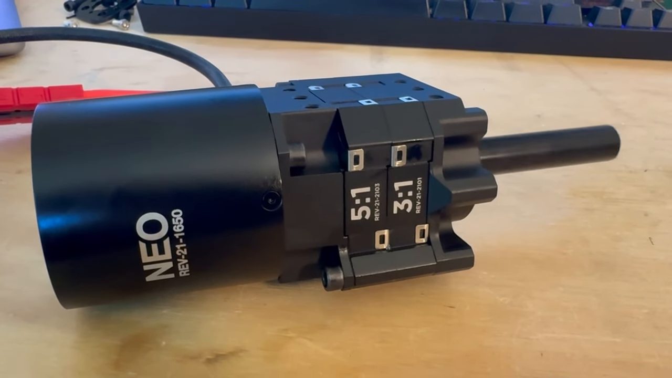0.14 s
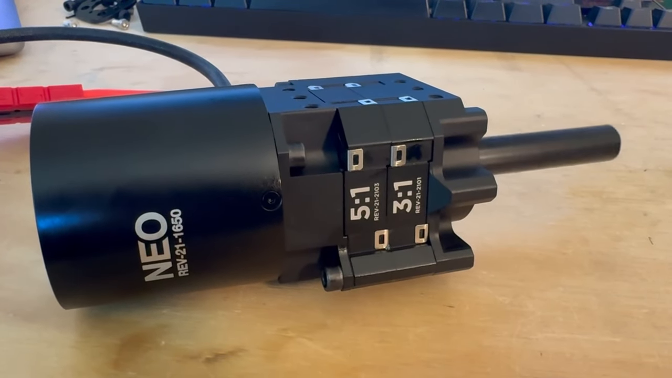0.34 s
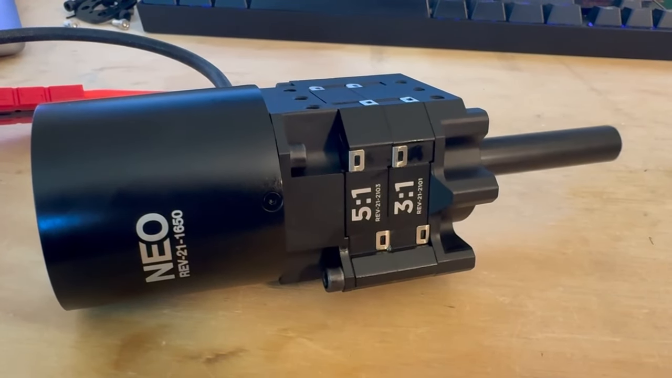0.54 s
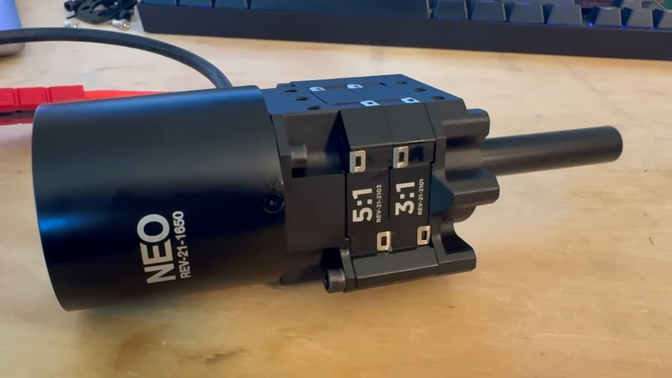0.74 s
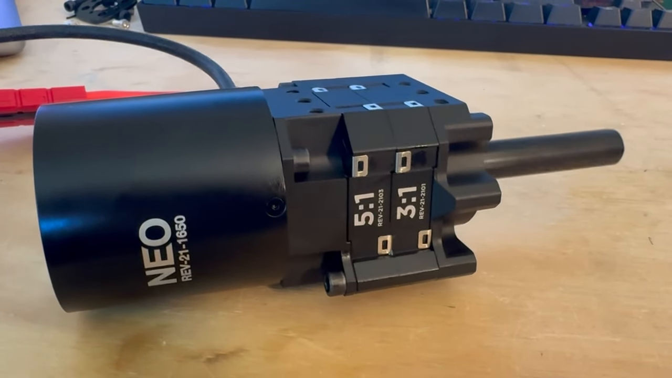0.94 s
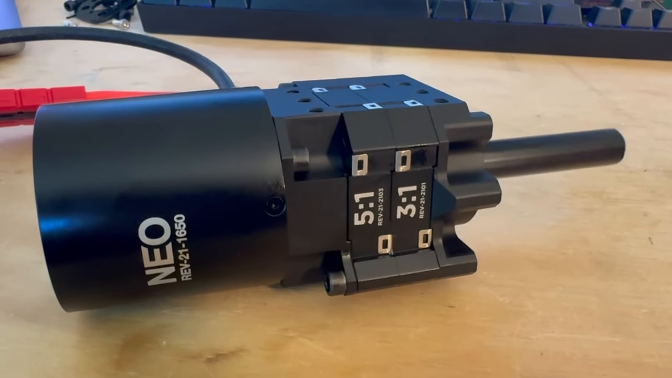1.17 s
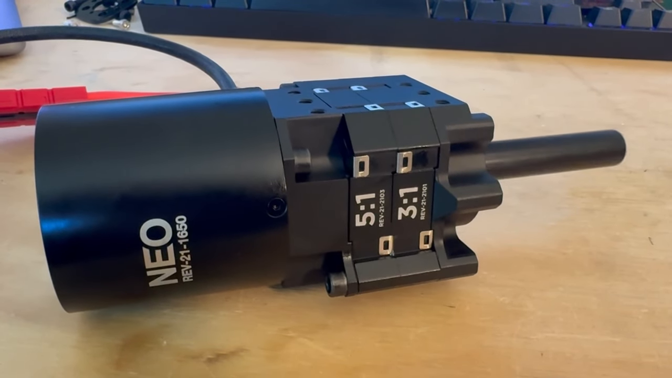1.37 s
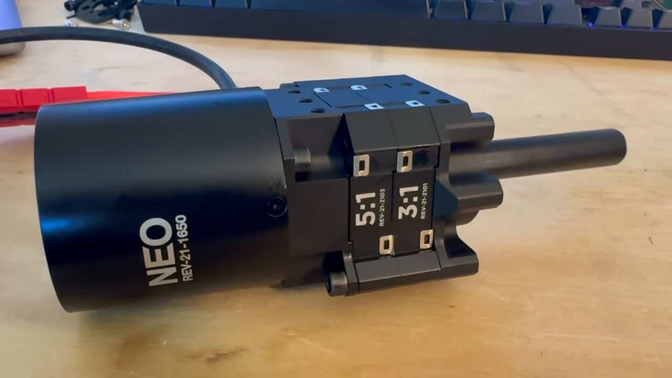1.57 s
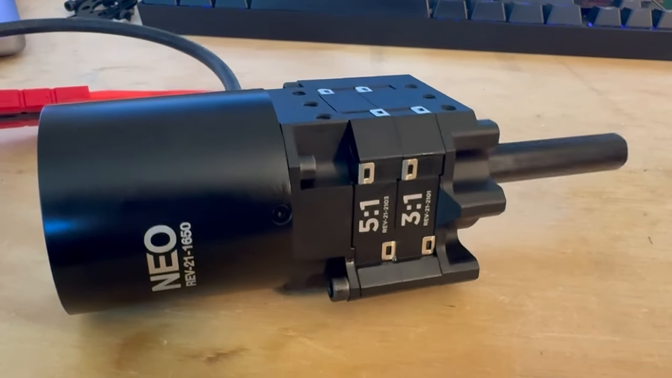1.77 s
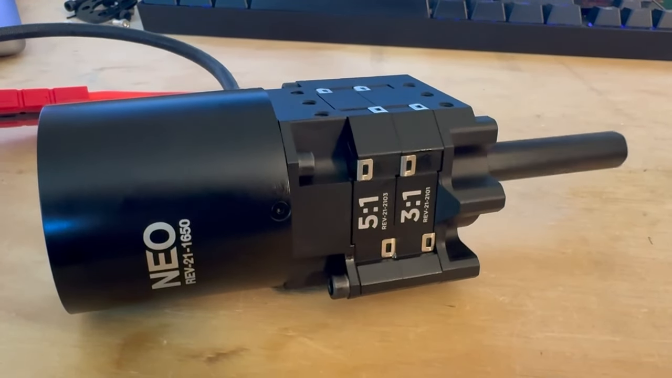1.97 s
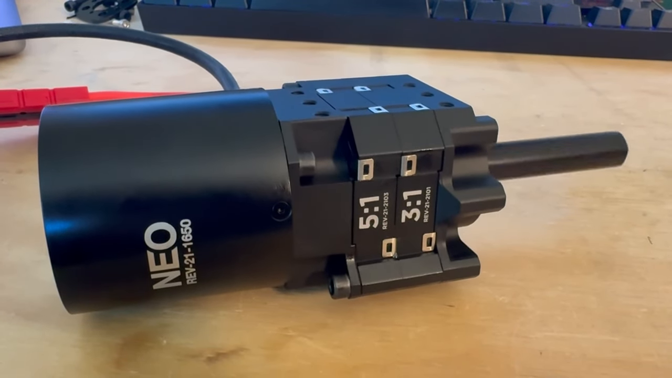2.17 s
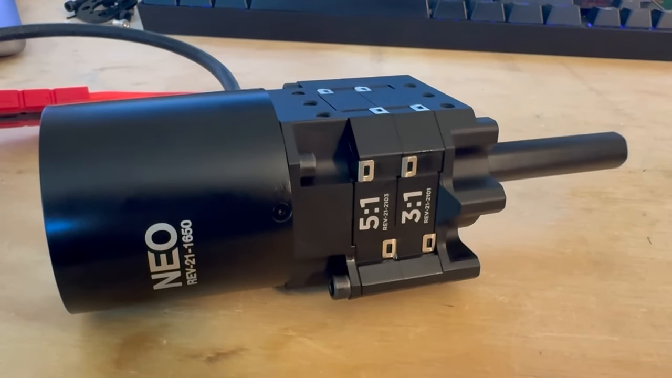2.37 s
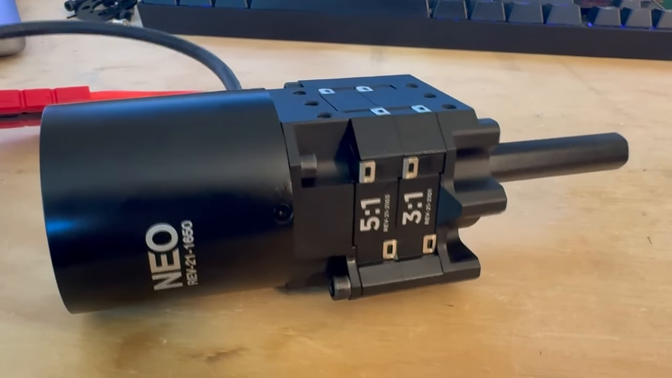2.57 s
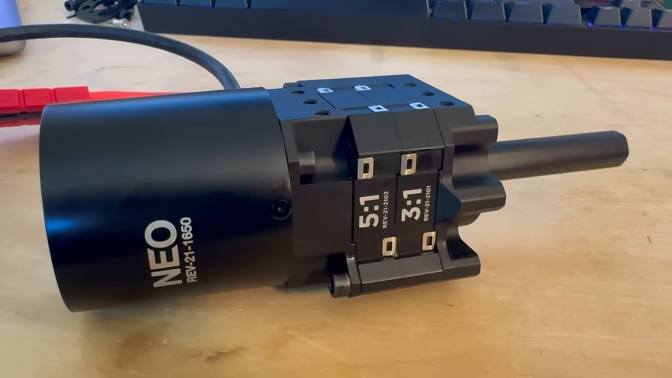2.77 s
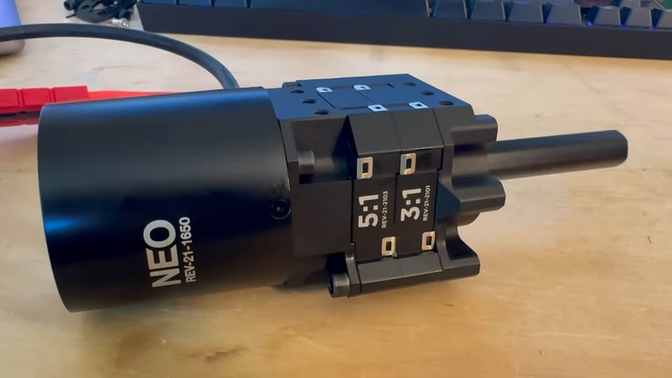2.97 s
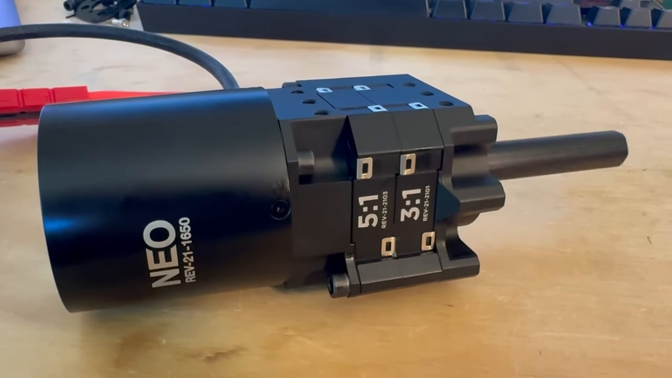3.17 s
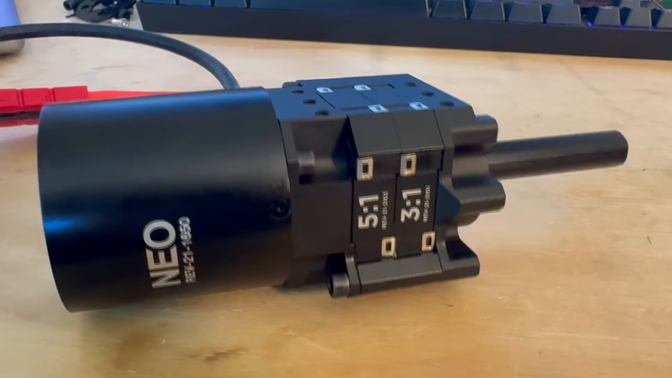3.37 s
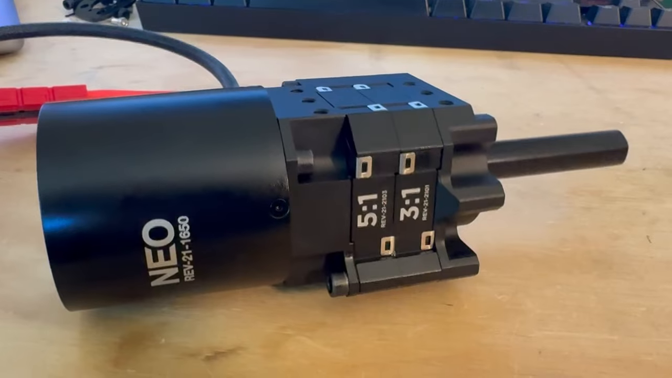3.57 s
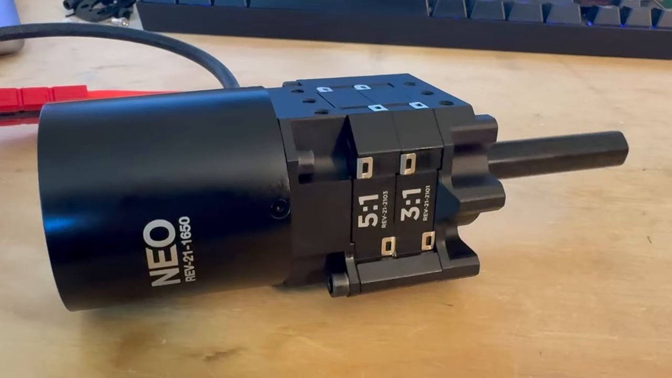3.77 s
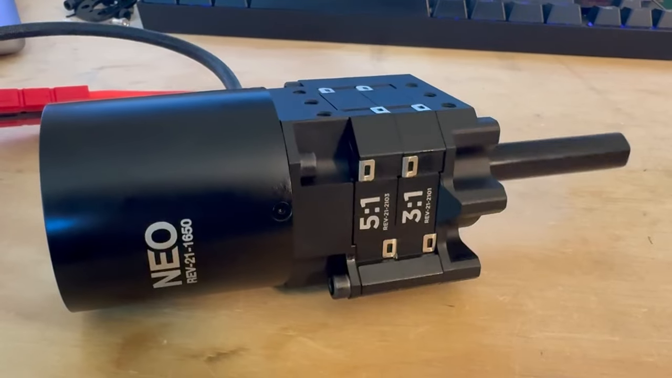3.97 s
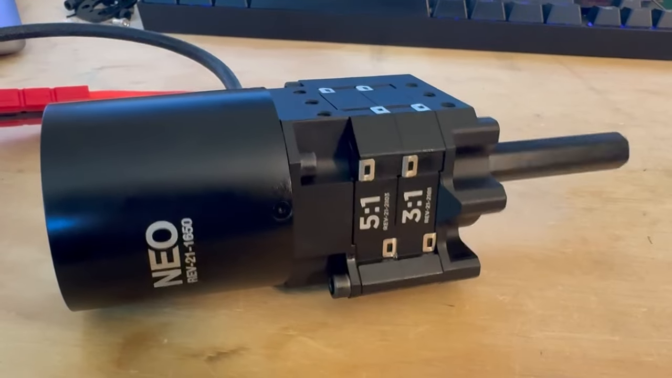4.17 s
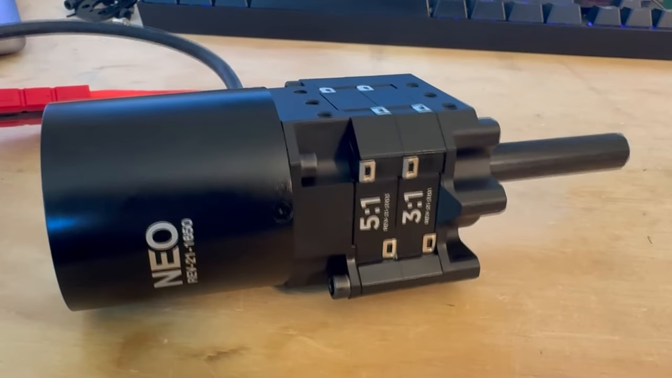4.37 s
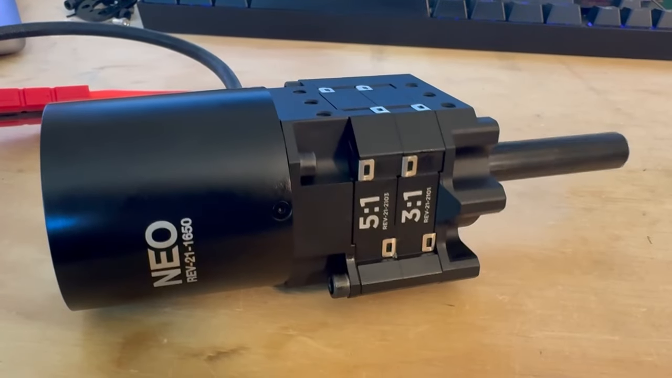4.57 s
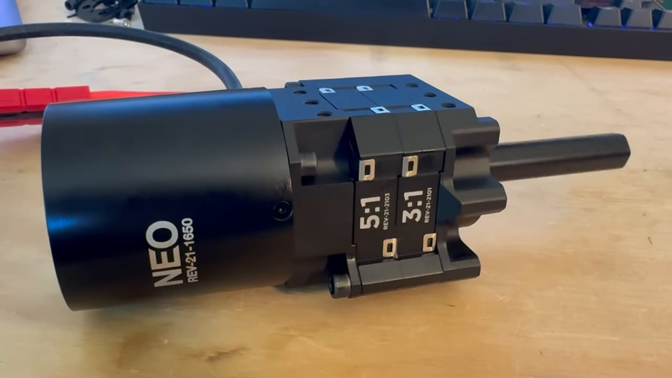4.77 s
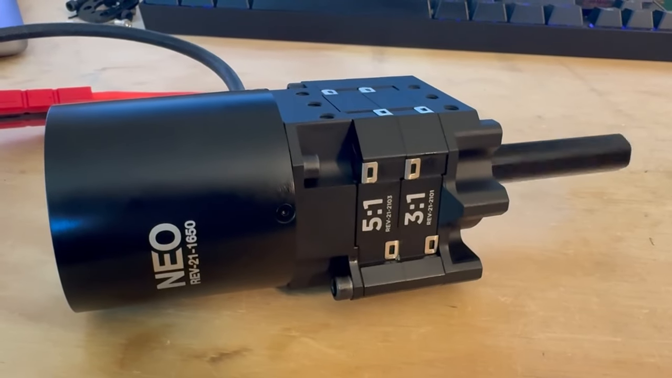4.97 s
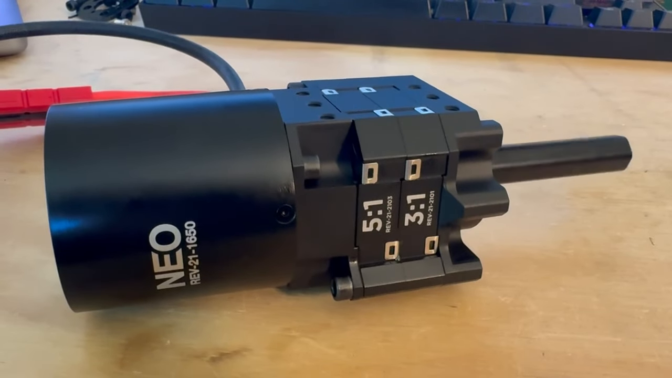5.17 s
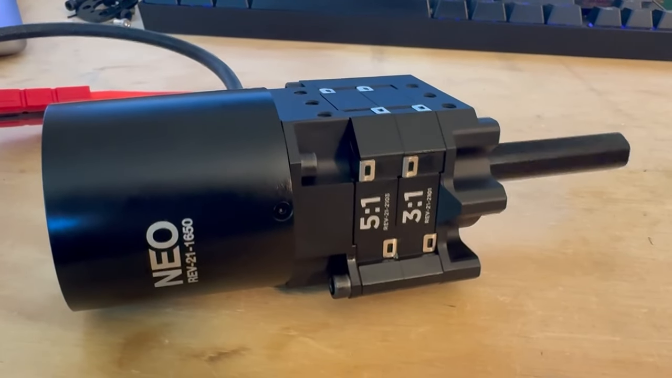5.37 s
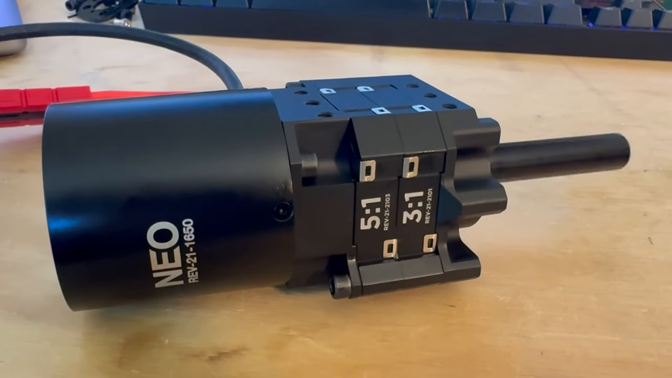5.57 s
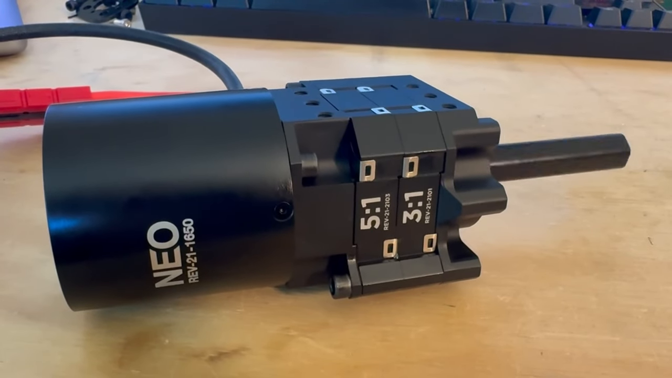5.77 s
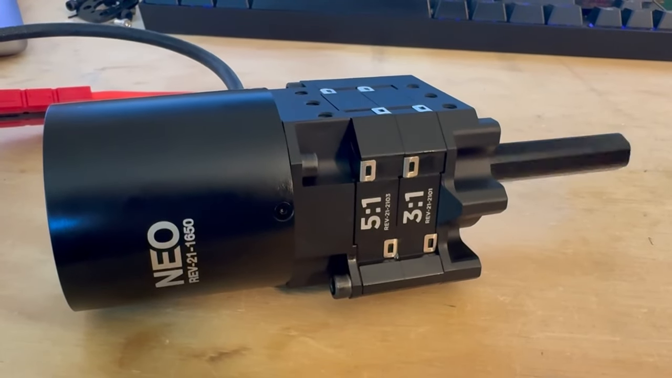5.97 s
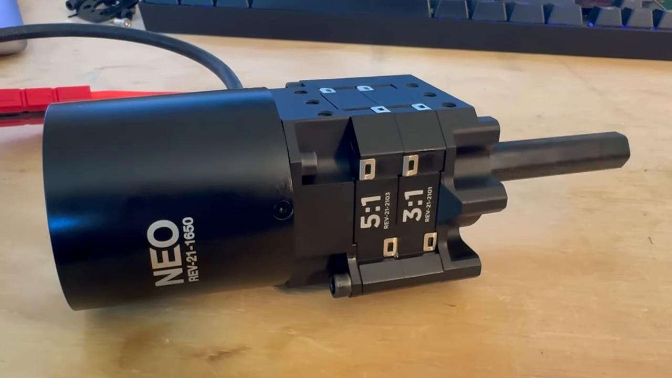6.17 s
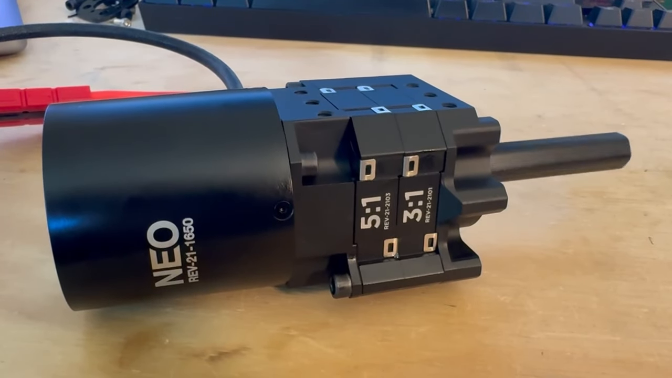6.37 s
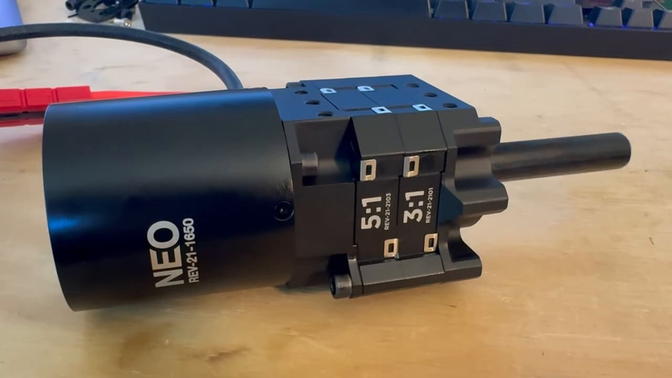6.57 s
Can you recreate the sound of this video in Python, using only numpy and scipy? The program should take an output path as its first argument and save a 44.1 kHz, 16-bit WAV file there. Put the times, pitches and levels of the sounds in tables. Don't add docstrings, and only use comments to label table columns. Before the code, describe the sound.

A small electric motor and gearbox lie on a wooden desk, recorded very close in stereo, dry, with no other activity. From 0 to 0.8 seconds it runs steadily at top speed: a hard layered whine, low desk hum and a bright, sizzling gear hiss strongest around 7 to 9 kilohertz. From about 0.8 seconds pitch and level step downward, quickly until 2.6, with sharper tooth clicks near 1.1, 2.1 and 2.7. It nearly holds around 2.7 to 2.9, then sinks again, tones swelling briefly as they cross desk resonances. Between 4.1 and 4.5 it drops noticeably and the drive goes slack; the whine weakens and a grainy, fluttering rub remains. From 5 to 6.6 it eases to under a third of its first speed, a quiet low whirr with faint rattles and tiny dry ticks near 5.6 and 6.15, still turning at the end.

```python
import sys
import numpy as np
from scipy import signal
from scipy.io import wavfile
from scipy.ndimage import uniform_filter1d

SR = 44100
rng = np.random.default_rng(int(sys.argv[2]) if len(sys.argv) > 2 else 0)


def wav_record(signal):
    frames = np.transpose(np.atleast_2d(signal))
    bounded = np.clip(frames, -1, 1)
    quanta = np.round(bounded * 32767).astype(np.int16)
    wavfile.write(sys.argv[1], SR, quanta)


def ratio_of_db(decibels):
    return 10 ** (np.asarray(decibels, float) / 20)


N = 291921

# turns_per_s, level_db
ROCKING = [(36, -70), (49, -51), (54, -49), (68, -44), (72, -48), (84, -29.5), (105, -26), (111, -24.5)]
ROTOR_ORDERS = [
    2,
    3,
    4,
    13,
    14,
    15,
]
# full_speed_db, slope_db_per_octave, slack_change_db, unsteadiness (0-1)
ROTOR_FORCES = [(0.5, 9, -7.5, 0.07), (-7, 10, -7.5, 0.11), (-10, 7, -20.5, .07), (6, 2, -25, 0.2),
                (-3.5, 2, -1, 0.25), (-7, 3, -12, 0.62)]


def rotor():
    sound = tone(1, read(ROCKING, speed())[0], shake=0.069)
    for order, (*force, shake) in zip(ROTOR_ORDERS, ROTOR_FORCES):
        sound = sound + tone(order, passed(order, *force), shake)
    switching = tone(6 * 7, passed(6 * 7, -1.6, 0, -27), shake=0.25)
    return sound + switching * ratio_of_db(np.array([[2], [-4]]))


def slow_stage():
    output_angle = 2 * np.pi * turns() / (3 * 5)
    groan_db = 10 * (np.cos(output_angle + 2.15) - 0.6)
    sideband = tone(5, passed(5, -33, -2.5, 10) + groan_db, shake=0.3)
    mesh = tone(4.62, passed(4.65, -32.5, -6, 6.9) + groan_db, shake=0.4)
    octave = tone(9.3, passed(9.18, -40, -8, 14.2) + 0.73 * groan_db, shake=0.68)
    return sideband + mesh + octave


# pitch_hz, left_db, right_db
TEETH = [(1400, -12, -16.5), (2580, -20.5, -27), (3340, -10.5, -21.5), (4580, -8.5, -16), (5070, -7, -15.5),
         (6640, -7.5, -11.5), (7400, 0, -4.5), (8600, -5.5, -6), (9600, -17, -17), (11300, -22.5, -22.5),
         (12200, -16.5, -16.5), (13050, -22.5, -23.5), (14500, -13.5, -13), (15600, -22, -27)]
# pitch_hz, loss (dB per dB that the hiss has dropped)
DULLING = [(1400, -0.55), (3000, 0), (9000, 0), (10300, -0.1), (12000, 0.72), (15000, 0.65)]
# start_s, peak_db
CATCHES = [(0.5651, -22), (0.5901, -14), (1.0061, -14), (1.1042, -10), (1.9026, -17), (2.0673, -8),
           (2.2633, -13), (2.325, -16), (2.416, -26), (2.493, -23), (2.6802, -12.5), (3.059, -18),
           (3.4255, -16), (3.741, -25), (3.8212, -33), (4.0337, -32), (4.1589, -22), (4.3919, -24),
           (4.564, -28), (4.7137, -29), (4.891, -20), (4.9134, -24), (5.1854, -19), (5.2495, -32),
           (5.5832, -31), (5.6542, -22), (5.8536, -25), (5.91, -26), (6.152, -22.5)]


def teeth():
    hiss_db = law(-25.5, 8.86, -0.4)
    slowness = 1 - speed() / 130
    drive = contacts(300, 4.5, 0.29 * slowness, 1.6 * slowness, 25) * tightness(1)

    start_s, peak_db = np.transpose(CATCHES)
    at = (start_s * SR).astype(int)
    catches = np.zeros(N)
    catches[at] = ratio_of_db(1.17 * (peak_db - hiss_db[at]) - 12.5)
    fade = np.exp(-np.arange(400) / 67.0)
    drive *= 1 + signal.oaconvolve(catches, fade)[:N]

    dulling_hz, rate = np.transpose(DULLING)

    def gain_db(hz, at):
        dulling_db = np.interp(hz, dulling_hz, rate) * (hiss_db[at] + 28.5)
        return 5.0 + housing_db(hz) + hiss_db[at] + dulling_db

    return heard(drive, TEETH, 256, gain_db, patchy_db=1.08)


# pitch_hz, width_hz, change_db
HOUSING = [(4310, 140, 1.5), (4460, 120, -1), (5270, 143, 4), (6270, 134, 4.5), (6670, 130, -2),
           (7400, 126, 4.5), (8200, 100, 10.5), (9980, 410, 9.5), (10500, 150, 1), (10400, 150, 4),
           (13000, 120, -5), (15700, 90, 2)]


def housing_db(hz):
    return sum(db * np.exp(-((hz - mode_hz) / width_hz) ** 2) for mode_hz, width_hz, db in HOUSING)


# pitch_hz, left_db, right_db
DESK = [(30, -25, -27), (72, -4.5, -7), (123, -3.5, -2), (261, 0.5, 1), (292, -15, -9), (325, -1.5, -2.5),
        (560, -11.5, -7), (551.6, -14.5, -25.5), (862, -8.5, -16.5), (954, 3.5, -8), (1048, -3.5, -4),
        (1320, -7.5, -11), (1420, -18.5, -16), (1580, -37, -39)]


def desk_and_case():
    desk_db = law(-40, 4.07, 0.42) + 1.5 * wander(2.2)
    case_db = law(-39.5, 4.45, 1.1) + 1.1 * wander(6.4)
    drive = contacts(120, 3.6, 0.018, 0.4, 6.2) * tightness(2)

    def gain_db(hz, at):
        return np.where(hz < 700, desk_db[at] + 6.0, case_db[at] + 7.0)

    return heard(drive, DESK, 2048, gain_db, patchy_db=1.43)


# start_s, peak_db
TICKS = [(5.5822, -43), (5.654, -36), (6.1524, -41)]


def ticks():
    train = np.zeros(N)
    for start_s, peak_db in TICKS:
        train[int(start_s * SR)] = ratio_of_db(peak_db + 2.0)
    bright_noise = np.diff(rng.standard_normal(600), 2)
    burst = bright_noise * np.exp(-np.arange(598) / 120.0) / 2.5
    return signal.oaconvolve(train, burst)[:N]


# start_s, turns_per_s
SPEED = [(0, 111), (.79, 110.3), (.92, 105), (1.36, 98), (1.72, 87.8), (2.28, 80.8), (2.57, 73.6),
         (2.7, 72.1), (2.94, 71.8), (3.41, 67), (3.55, 63.4), (3.79, 62.5), (4.14, 57), (4.48, 46.7),
         (4.93, 44.2), (5.57, 36.5), (6.3, 32.1), (6.62, 31.6)]


def speed():
    start_s, turns_per_s = np.transpose(SPEED)
    return np.interp(np.arange(N) / SR, start_s, turns_per_s)


def turns():
    return np.cumsum(speed()) / SR


def law(full_db, db_per_octave, slack_db):
    full_speed, slack_speed, slack_range = 111, 54.3, 0.7
    slack = 1 / (1 + np.exp((speed() - slack_speed) / slack_range))
    return full_db + db_per_octave * np.log2(speed() / full_speed) + slack_db * slack


# pitch_hz, width_hz, level_db
PATH = [(90, 27, -36.5), (117.7, 20, -31.5), (132.8, 13, -31.5), (159.2, 19.8, -30.5), (214.5, 31.5, -24.5),
        (248.7, 15, -27.5), (334, 34, -34.5), (450.5, 76, -37), (933, 82, -37), (1010, 90, -41.5),
        (1090, 49, -56), (1310, 150, -52.5), (2400, 140, -40), (2620, 140, -53)]


def passed(order, *force):
    hz = np.arange(5000.0)
    gain = sum(ratio_of_db(db) / (1 + (2 * (hz - mode_hz) / width_hz) ** 2) ** 1.37 for mode_hz, width_hz, db in PATH)
    return law(*force) + np.interp(order * speed(), hz, 20 * np.log10(gain))


def tone(order, db, shake):
    hz = order * speed()
    left_db, right_db = read(DESK, hz)
    lead = read(PORTS, hz)[1]
    angle = 2 * np.pi * (np.cumsum(hz) / SR + rng.random()) + shake * wander(1.8)
    size = np.sqrt(2) * ratio_of_db(db + 10.4 * shake * wander(8.1))
    right = ratio_of_db(right_db - left_db) * np.cos(angle - lead)
    return size * np.array([np.cos(angle), right])


TIGHT = [(1 / 15, 0.064, 0.072, 2.7), (2 / 15, 0.04, 0.037, -0.55), (1 / 5, 0.047, 0.0093, 3.05),
         (2 / 5, 0.027, 0.01, -2), (4 / 5, 0.038, 0.023, 0.62), (1 / 1, 0.08, 0.11, 0.61),
         (2 / 1, 0.068, 0.019, 4)]


def tightness(column):
    angle = 2 * np.pi * turns()
    return np.exp(sum(row[column] * np.cos(row[0] * angle + row[3]) for row in TIGHT))


def contacts(per_s, spread_db, share, flutter_db, flutter_hz):
    knock_db = spread_db * np.minimum(rng.exponential(size=N), 4)
    knocks = ratio_of_db(knock_db) * (rng.random(N) < per_s / SR)
    fade = np.exp(-np.arange(200) / 11.0)
    bursts = evened(signal.oaconvolve(knocks, fade)[:N])
    force = (1 + share * bursts) * ratio_of_db(flutter_db * wander(flutter_hz))
    return evened(force * rng.standard_normal((2, N)))


# pitch_hz, likeness (0-1), left_lead_radians
PORTS = [(40, .3, 0), (90, .9, 0), (450, .88, .1), (620, .4, .2), (950, .8, -.7), (1300, .65, 1.3),
         (2600, .25, 2.8), (4400, .5, .2), (6100, .6, 1), (6800, .65, .5), (7400, .86, 2.2),
         (8000, .86, 3.1), (11300, .8, 3.1), (12300, .4, 2), (13300, .2, .8), (14500, .45, .5),
         (15300, .9, 0)]


def heard(drive, colour, size, gain_db, patchy_db):
    hz, t, (a, b) = signal.stft(drive, SR, nperseg=size)
    left_db, right_db = (c[:, None] for c in read(colour, hz, outside=-70))
    same, lead = (c[:, None] for c in read(PORTS, hz))
    right = same * np.exp(-1j * lead) * a + np.sqrt(1 - same ** 2) * b
    pair = np.array([ratio_of_db(left_db) * a, ratio_of_db(right_db) * right])
    pair /= np.sqrt(np.mean(ratio_of_db(2 * left_db)))

    patches = rng.standard_normal(a.T.shape).T
    patches = uniform_filter1d(patches, size=7, axis=0)
    patches = evened(uniform_filter1d(patches, size=5, axis=1))

    at = np.minimum((t * SR).astype(int), N - 1)
    level_db = gain_db(hz[:, None], at) + patchy_db * patches
    return signal.istft(pair * ratio_of_db(level_db), SR, nperseg=size)[1][:, :N]


def read(rows, hz, outside=None):
    f, *columns = np.transpose(rows)
    return [np.interp(np.log(hz + 1), np.log(f + 1), c, outside, outside) for c in columns]


def wander(top_hz):
    memory = np.exp(-2 * np.pi * top_hz / SR)
    return evened(signal.lfilter([1], [1, -memory], rng.standard_normal(N)))


def evened(x):
    return x / np.sqrt(np.mean(x ** 2) + 1e-20)


def scene():
    return rotor() + slow_stage() + teeth() + desk_and_case() + ticks()


def low_pass(x):
    return signal.sosfilt(signal.butter(12, 15760, fs=SR, output="sos"), x)


def record(dry):
    return low_pass(dry)


dry = scene()
out = record(dry)
wav_record(out)
```